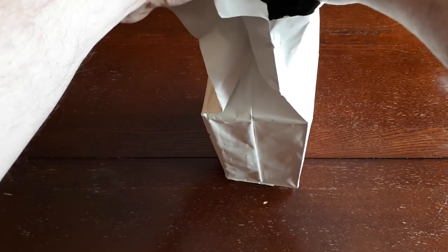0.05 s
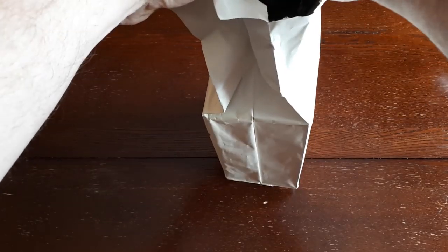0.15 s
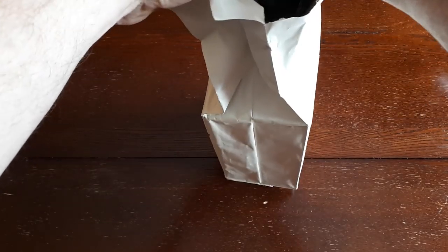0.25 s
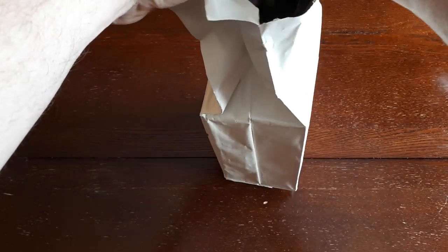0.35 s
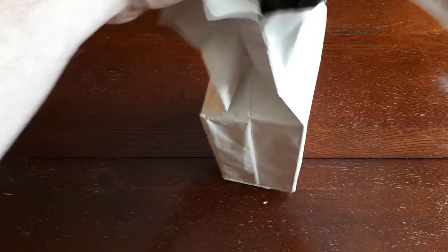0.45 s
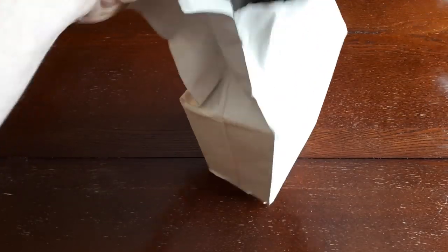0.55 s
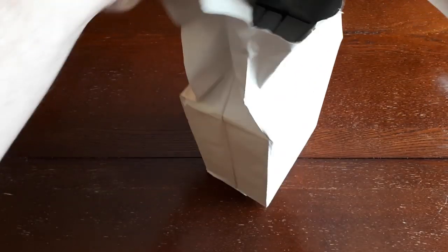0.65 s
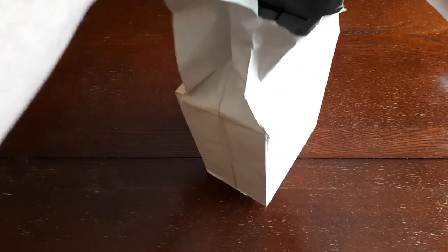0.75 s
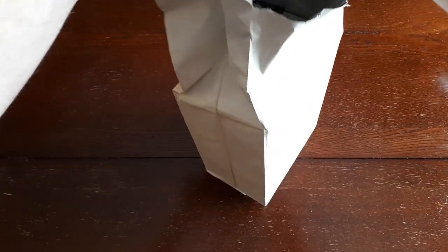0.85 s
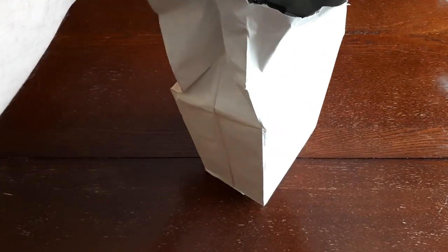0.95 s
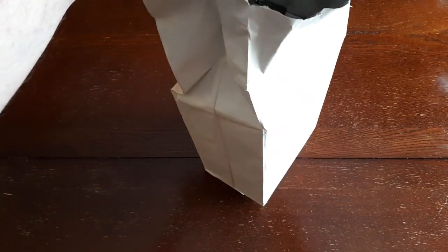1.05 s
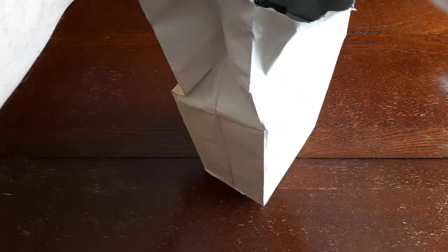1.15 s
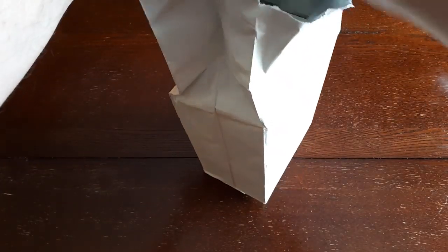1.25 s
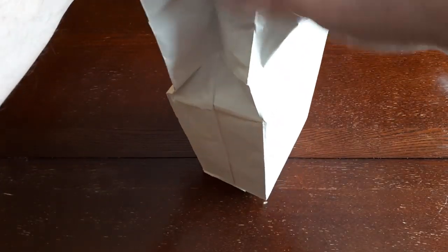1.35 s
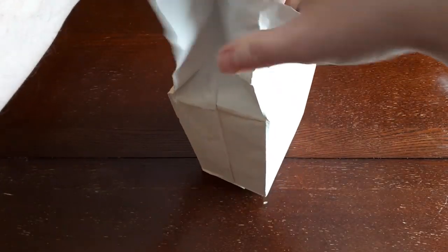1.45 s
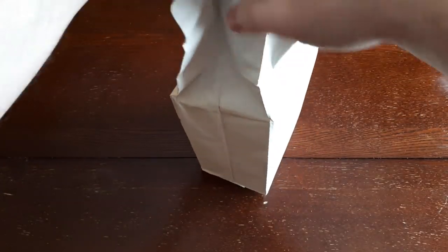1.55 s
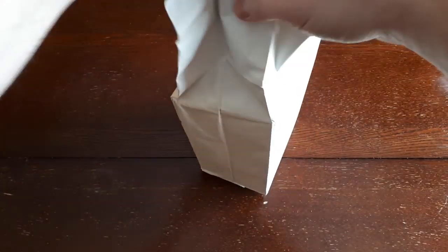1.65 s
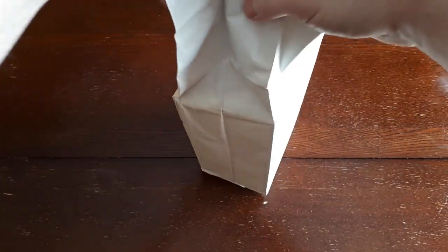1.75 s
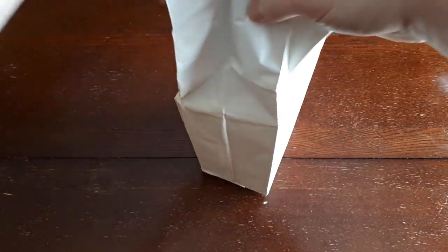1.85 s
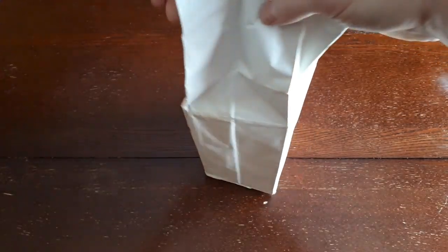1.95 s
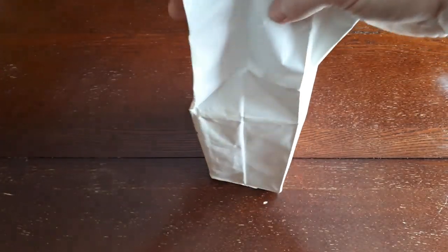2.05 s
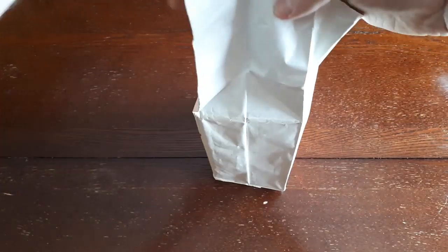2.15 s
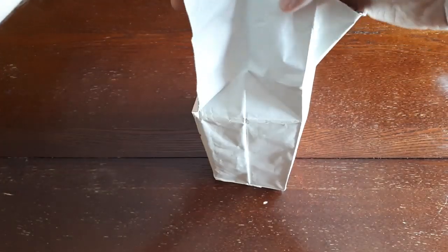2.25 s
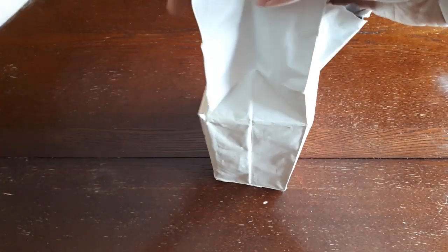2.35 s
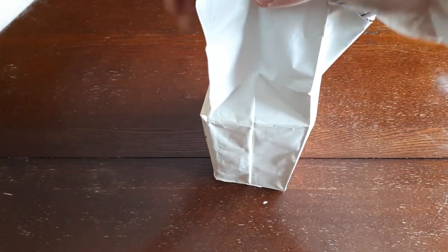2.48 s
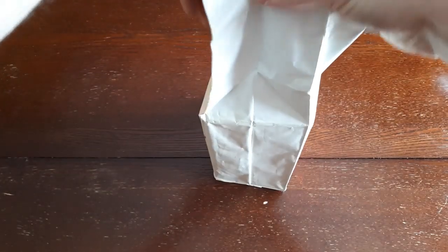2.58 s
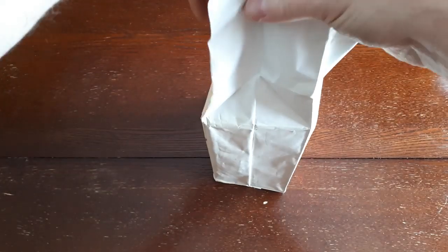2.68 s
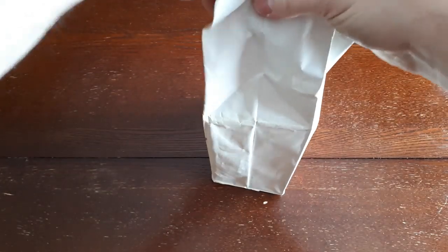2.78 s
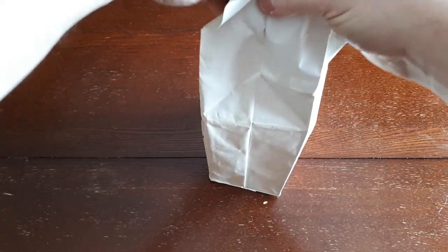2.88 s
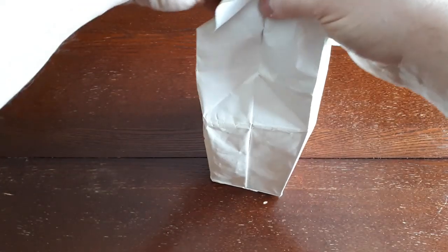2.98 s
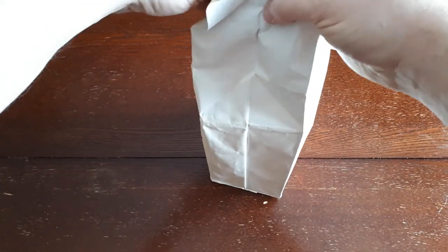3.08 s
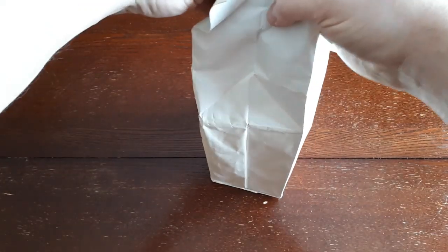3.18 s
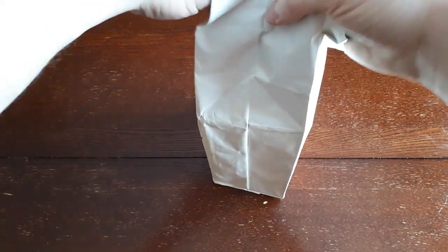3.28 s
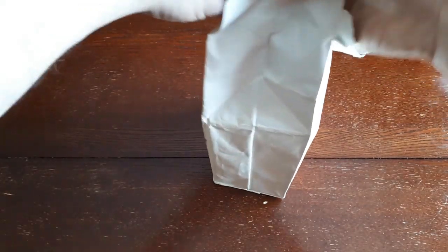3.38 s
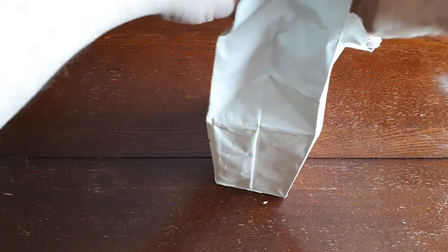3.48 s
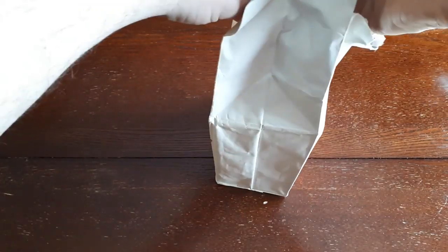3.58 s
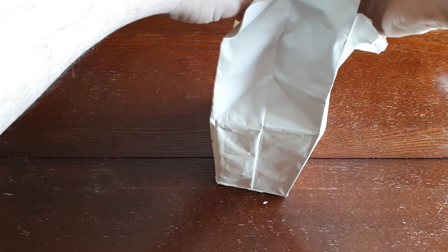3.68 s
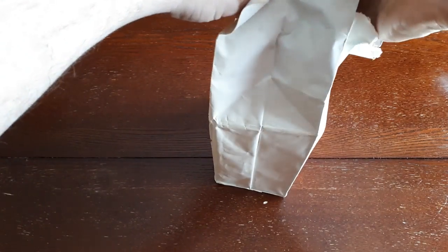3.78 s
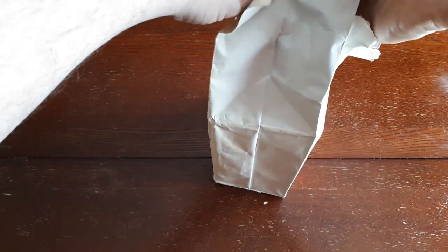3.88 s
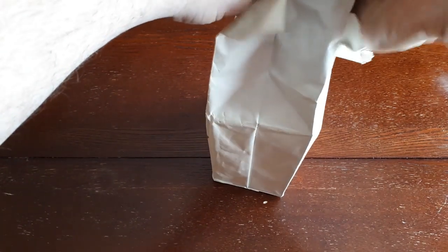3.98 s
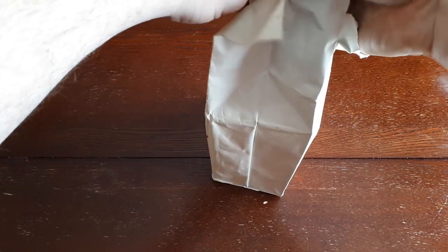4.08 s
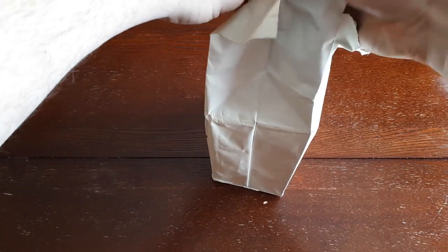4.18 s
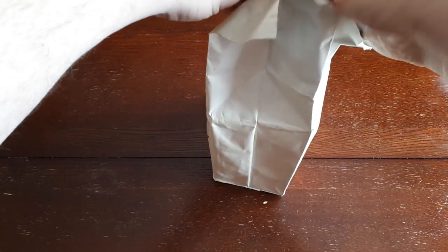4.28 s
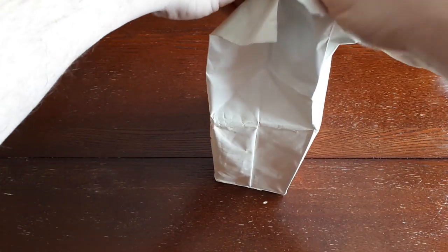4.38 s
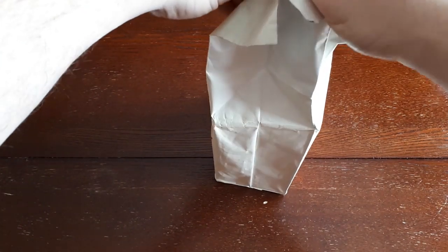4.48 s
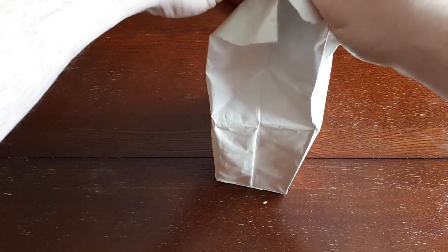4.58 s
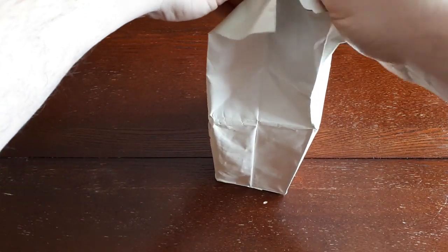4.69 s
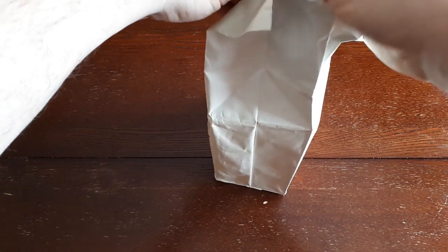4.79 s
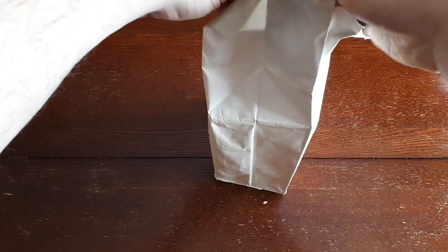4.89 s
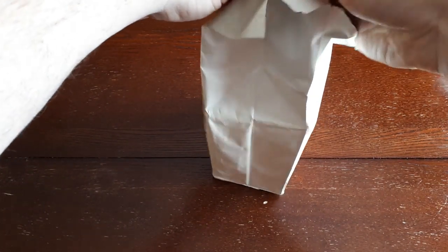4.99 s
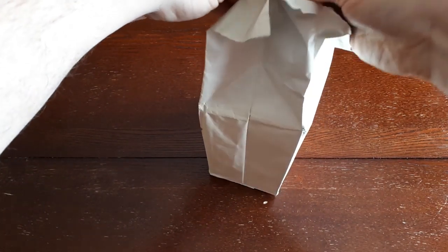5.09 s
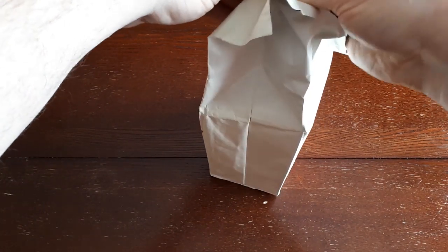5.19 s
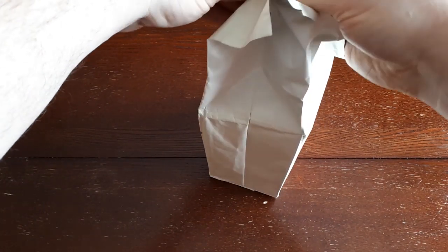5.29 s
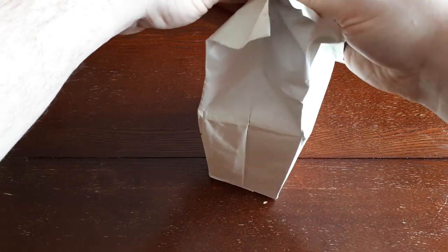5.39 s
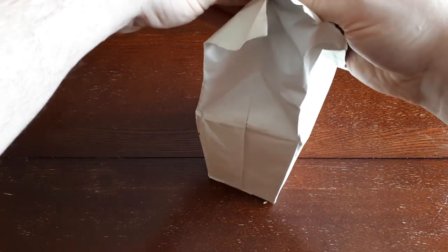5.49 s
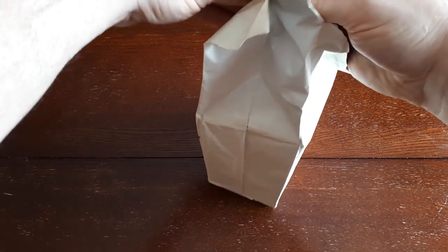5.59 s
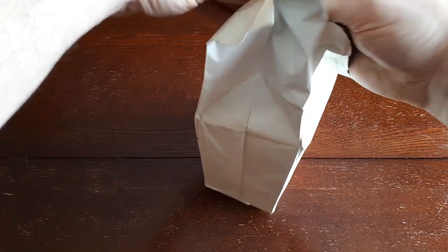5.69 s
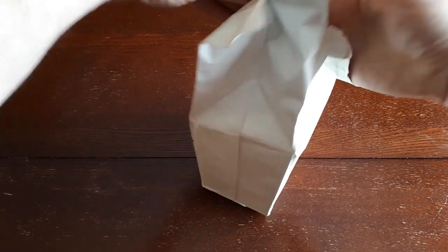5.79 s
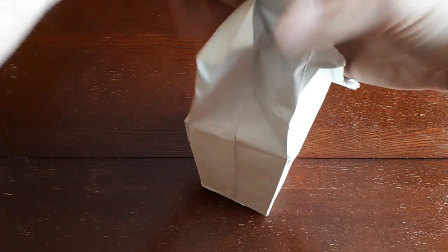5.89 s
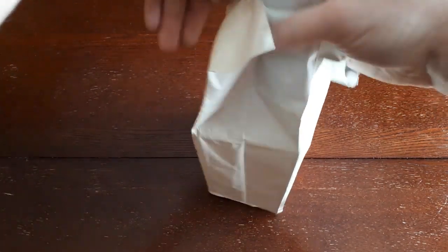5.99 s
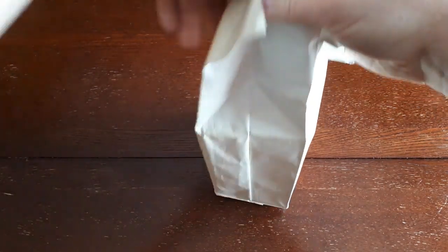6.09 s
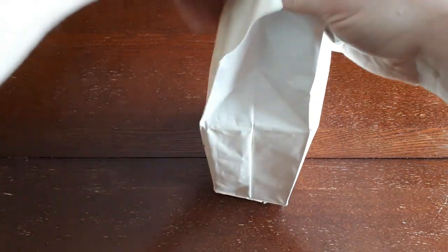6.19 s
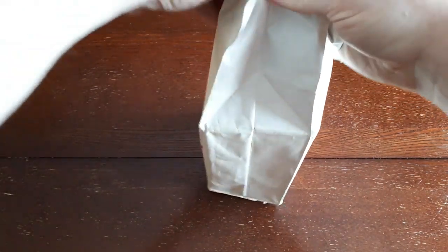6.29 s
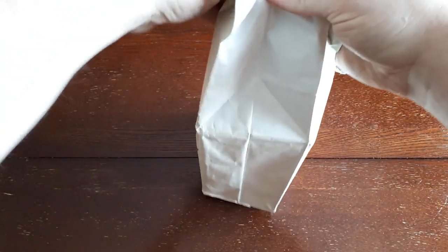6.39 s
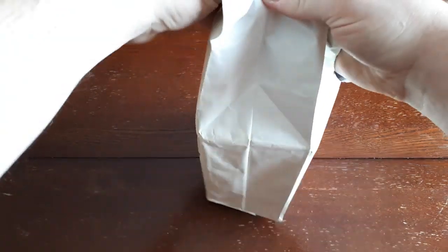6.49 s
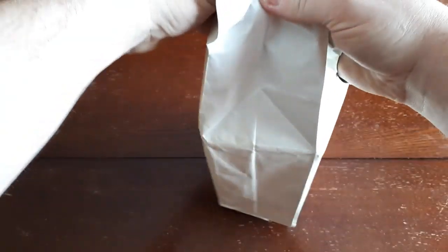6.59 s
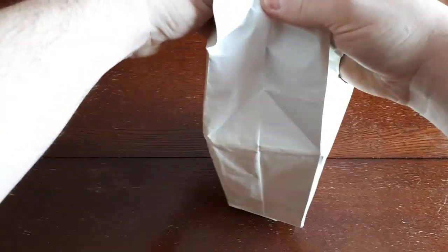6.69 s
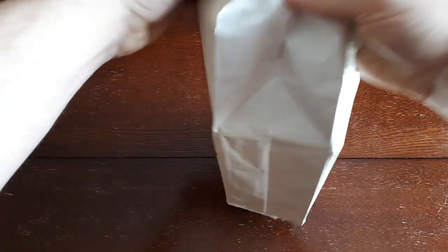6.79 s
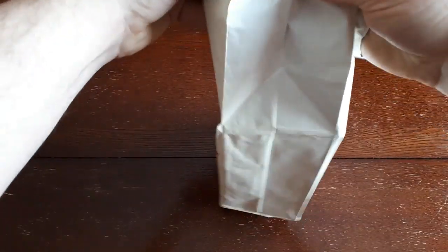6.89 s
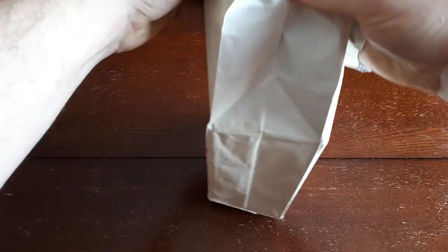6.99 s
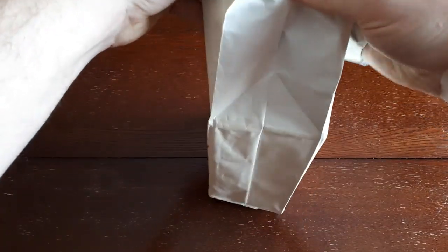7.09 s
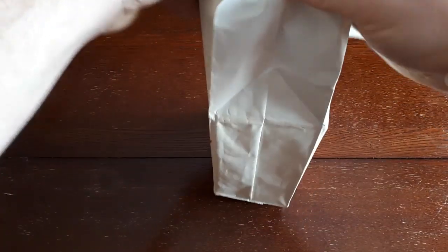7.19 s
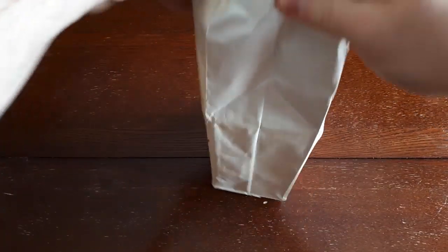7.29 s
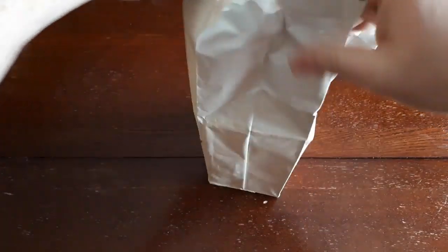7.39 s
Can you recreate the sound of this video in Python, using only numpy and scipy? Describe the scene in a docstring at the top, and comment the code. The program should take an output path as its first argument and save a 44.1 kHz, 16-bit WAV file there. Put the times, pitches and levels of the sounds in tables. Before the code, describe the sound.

A stiff paper bag with a foil lining is worked by hands on a wooden table, close by in stereo in a small dry room. Crackles start quietly, cluster around half a second, thicken between two and three and a half seconds, then thin to light rustling. Sharper snaps return after five seconds, with the loudest pops near 6.8, before a few last crinkles.

```python
"""Foil-lined paper bag handled.

A stiff bag is pulled open and handled on a wooden table in a small room, heard close by in stereo.
Creases snap: short jagged jolts ring a panel, crack paper and foil and thump the air in the bag.
Fingers and folds rub between them: band noise gated by tiny crinkles, coloured by panel and bag modes.
A thin rising whistle, a short diffuse room tail and steady room tone lie underneath."""
import sys
import numpy as np
from scipy import signal
from scipy.fft import rfft, irfft, next_fast_len
from scipy.io import wavfile
from scipy.ndimage import uniform_filter1d

SR = 44100
rng = np.random.default_rng(int(sys.argv[2]) if len(sys.argv) > 2 else 0)


def bounce(signal):
    """Save signal as a 16-bit WAV file at the path given by the first command-line argument."""
    frames = np.transpose(np.atleast_2d(signal))
    limited = np.clip(frames, -1, 1)
    pcm = np.round(limited * 32767).astype(np.int16)
    wavfile.write(sys.argv[1], SR, pcm)


N = 328530   # samples

# creases snapping; thump, paper, foil and settling levels are against the peak of the panel body:
# start_s, peak_db, pitch_hz, thump_db, paper_db, foil_db, settle_db, settle_t60_s, jump_s
CREASE_SNAPS = [(0.066, -44, 1140, -60, 6, -24, -1, 0.87, 0.0024),
                (0.126, -31.5, 1750, -23, -39, -41, -5.5, 0.43, 0.007),
                (0.294, -52, 660, -2, -8, -30, -32, 0.23, 0.0021),
                (0.36, -29, 740, -26, -2, -22, -6.5, 0.52, 0.002),
                (0.409, -28, 1930, -24, -11, -30, -16, 0.22, 0.0031),
                (0.466, -18.5, 1190, -13.5, 4, 2.5, -4.5, 0.27, 0.005),
                (0.482, -20, 700, -20, -6, -11, 0, 0.4, 0.003),
                (0.498, -31, 1200, -9, -4, -12, -16, 0.3, 0.0027),
                (0.512, -19, 693, -4, -8, -39, -5.5, 0.27, 0.0029),
                (0.541, -26, 1180, 0.5, -9, -25, -22, 0.23, 0.0041),
                (0.561, -23.5, 704, -3, -17, -33, -23, 0.21, 0.0032),
                (0.586, -30.5, 564, -4, -20, -30, -17, 0.3, 0.0041),
                (0.603, -25.5, 1750, -8.5, -8, -30, -9, 0.49, 0.0045),
                (0.657, -25.5, 736, -10.5, -20, -40, -8, 0.33, 0.0016),
                (0.677, -25.5, 730, -17, -27, -58, -8, 0.33, 0.0033),
                (0.823, -36.5, 1090, -30, -3, -13, -1.5, 0.22, 0.0055),
                (0.898, -41, 760, -25, -33, -24, -4, 0.56, 0.003),
                (0.96, -35.5, 740, -40, -11, -52, -2, 0.24, 0.0047),
                (1.023, -19.5, 1410, -15, -14, -23, -2, 0.17, 0.0048),
                (1.113, -35, 624, -17, -12, -8, -12.5, 1, 0.0026),
                (1.167, -38, 660, -14, -13, -18, -3.5, 0.42, 0.0043),
                (1.281, -49, 740, -9, -24, -50, -7.5, 0.3, 0.0046),
                (1.314, -46.5, 800, 0, -29, -47, -28.5, 0.3, 0.0023),
                (1.399, -54, 1120, -18, -20, -43, -2, 0.4, 0.0056),
                (1.453, -29.5, 1410, -20, -28, -35, -6, 0.34, 0.0014),
                (1.495, -23.5, 1140, -32, 0, -16, -5, 0.52, 0.0065),
                (1.506, -16, 1510, -19, -13, -25, -4, 0.31, 0.0035),
                (1.553, -23, 1850, -39, -13, -23, -7, 0.4, 0.0069),
                (1.585, -30, 958, -28, -13, -25, -17, 0.35, 0.0026),
                (1.621, -22.5, 800, -19, -28, -31, -18, 0.18, 0.0038),
                (1.648, -16.5, 1140, -19.5, 2.5, -18, -12, 0.4, 0.0079),
                (1.671, -21.5, 755, -43, 7, 1, -25.5, 0.98, 0.0079),
                (1.837, -23.5, 900, -75, -17, -66, -9.5, 0.59, 0.0067),
                (1.926, -35, 1860, -48, -26, -29, -5, 0.58, 0.004),
                (2.035, -32.5, 2340, -30, -30, -15, -18, 0.3, 0.0078),
                (2.073, -19, 785, -24.5, 2, -17, -3.5, 0.055, 0.0031),
                (2.128, -32.5, 720, -32, -23, -33, -25, 0.35, 0.0061),
                (2.213, -33, 800, -14, -16, -37, -13, 0.35, 0.003),
                (2.246, -30, 750, -11, 1, -35, -8, 0.22, 0.011),
                (2.307, -43, 820, -30, 16.5, -25, -14, 0.35, 0.0042),
                (2.337, -23, 1860, -35, -5, -22, -19, 0.22, 0.004),
                (2.362, -14.5, 1650, -22.5, -10, -49, -1, 0.11, 0.0032),
                (2.424, -16.5, 980, -28, 6, -23, -6, 0.085, 0.0043),
                (2.521, -36.5, 680, -12, -22, -19, 0, 0.47, 0.0039),
                (2.548, -27, 780, -13, 4, -7, -3.5, 0.37, 0.0042),
                (2.57, -27.5, 584, -11, 11.5, -28, 1, 0.22, 0.0067),
                (2.615, -28.5, 1520, -36, -1, -19, -1, 0.35, 0.0035),
                (2.645, -24.5, 1900, -37, 3, -25, -22, 0.3, 0.0039),
                (2.654, -36, 1060, -29, -11, 5, -2.5, 0.24, 0.0041),
                (2.683, -14.5, 1610, -22, 2.5, -19, -9, 0.2, 0.0035),
                (2.743, -26.5, 2020, -25, -7, -29, 0, 0.24, 0.0033),
                (2.748, -12, 805, -42, -7.5, -42, -12, 0.43, 0.0019),
                (2.762, -41, 864, -21, 0, -9, -4, 0.28, 0.0046),
                (2.774, -10.5, 1400, -29, 0.5, -25, -13.5, 0.19, 0.0023),
                (2.84, -27.5, 800, -14, 0, -22, -0.5, 0.35, 0.0022),
                (2.85, -25, 870, -24, 5.5, -24, -4.5, 0.36, 0.0069),
                (2.888, -27.5, 890, -16, 6.5, -32, -2.5, 0.3, 0.0075),
                (2.925, -30.5, 950, -16, -13, -41, -3, 0.57, 0.0049),
                (2.981, -29, 760, -19, 4.5, -26, 1, 0.23, 0.0092),
                (3.021, -21.5, 885, -24, -5, -42, -10, 0.28, 0.0019),
                (3.027, -16.5, 1000, -6.5, -5.5, -45, -12.5, 0.37, 0.0053),
                (3.1, -23, 846, -10, -20, -42, -2, 0.25, 0.0023),
                (3.127, -23, 900, -29, 1, -35, -2, 0.12, 0.003),
                (3.142, -12, 1340, -30, 1, -5, -24, 0.17, 0.0028),
                (3.224, -12.5, 2730, -87, -4, -20, -8, 0.11, 0.0032),
                (3.327, -20.5, 830, -16, -22, -27, -9, 0.37, 0.0022),
                (3.379, -23.5, 736, -11, 8.5, -12, -12, 0.49, 0.0063),
                (3.458, -24, 780, -16, -2, -33, -13, 0.36, 0.002),
                (3.48, -38, 766, -20, -14, -21, -18, 0.31, 0.0035),
                (3.501, -29.5, 750, -0.5, -23, -22, -24, 0.39, 0.0013),
                (3.667, -52.5, 1120, -40, 11, -2, 3, 0.84, 0.0027),
                (3.731, -41, 784, -31, -13, -9, -14, 0.35, 0.0035),
                (3.968, -28.5, 620, -21.5, -9, -20, -3, 0.84, 0.006),
                (4.013, -30.5, 630, -19, -17, -9, -8, 0.54, 0.0031),
                (4.033, -29.5, 2000, -27, -6, 1.5, -5, 0.23, 0.0033),
                (4.045, -24.5, 1840, -18, -11, -14, -24, 0.3, 0.0015),
                (4.11, -29, 1730, -19, 0, -14, -7, 0.16, 0.0059),
                (4.121, -33, 1870, -15.5, 0.5, -23.5, -21, 0.27, 0.0036),
                (4.252, -43.5, 1740, -29, -10, -5, -7.5, 0.78, 0.0028),
                (4.316, -38, 780, 7, -27, -20, -5, 0.26, 0.0022),
                (4.397, -45.5, 734, 0, -21, -1, -19, 0.35, 0.0027),
                (4.463, -46.5, 680, 3, -19, -10, -15, 0.38, 0.0033),
                (4.519, -43, 660, -4, -28, -34, -14, 0.35, 0.0076),
                (4.53, -35.5, 587, -6, -41, -27, -9, 0.26, 0.0051),
                (4.564, -53, 686, -21, -7, 1, -22, 0.29, 0.0029),
                (4.755, -46, 1770, -37, -16, 3, -18, 0.35, 0.0031),
                (4.831, -33, 1640, -38, -11, -25, -7, 1, 0.0032),
                (4.887, -24, 4200, -36, -5, -8, -7, 0.13, 0.0053),
                (4.893, -36, 810, -11, 11, -0.5, 1.5, 0.18, 0.0062),
                (5.017, -31, 677, -35, -12, -9, -10, 0.4, 0.0018),
                (5.027, -16.5, 1870, -29, -8, -19, -21, 1, 0.0037),
                (5.154, -43.5, 714, -6, -8, -13, -0.5, 0.31, 0.0043),
                (5.177, -36, 1200, -18, -13, -39, -2, 0.59, 0.0041),
                (5.212, -29, 1590, -35, -20, -52, -12, 0.48, 0.0021),
                (5.338, -53, 4450, -17, -14, 16, -13, 0.3, 0.0039),
                (5.37, -26.5, 2200, -42, -3, -15, -31, 0.23, 0.0023),
                (5.384, -43.5, 2080, -15, 0, 9, -0.5, 0.55, 0.0062),
                (5.427, -22.5, 5630, -40, -28, -7, -26, 0.3, 0.0012),
                (5.435, -33.5, 1600, -16, -1, -3, -2.5, 0.41, 0.0032),
                (5.45, -16.5, 2060, -43, -8, -15, -18, 0.5, 0.0018),
                (5.518, -23, 1400, -41, -6, -54, 5, 0.088, 0.0022),
                (5.559, -31, 4600, -21, -16, -7, -25, 0.35, 0.002),
                (5.691, -48.5, 785, -13, -6, 0, -9, 0.3, 0.0033),
                (5.743, -38, 890, -57, 0.5, -29, 2, 0.88, 0.0032),
                (5.809, -35.5, 885, -39, -4, -27, 3.5, 0.14, 0.0059),
                (5.866, -47, 861, -42, 4, -11, 1, 0.39, 0.0035),
                (5.892, -44, 835, -41, 2, -15, -12.5, 0.35, 0.004),
                (5.919, -26, 2310, -43, -3, -17, -13, 0.42, 0.0066),
                (5.938, -28, 1190, -24, 4, -26, -0.5, 0.24, 0.0037),
                (5.986, -37.5, 825, -27, 14, -30, -22, 0.22, 0.0029),
                (6.048, -35, 766, -15, -12, -10, -15, 0.35, 0.0026),
                (6.077, -38, 750, -5, -28, -34, 6, 0.13, 0.0038),
                (6.133, -43.5, 830, -5, 3, -7, 1.5, 0.3, 0.0031),
                (6.156, -38, 1750, -25, 0, -34, -2, 0.55, 0.0043),
                (6.185, -15, 1650, -25, 1.5, -4, -14, 0.39, 0.0038),
                (6.2, -23.5, 810, -13, -20, -30, -18, 0.3, 0.0049),
                (6.222, -20, 1010, -16, -3, -25, -10, 0.65, 0.0037),
                (6.259, -21, 870, -16, -15, -28, -11, 0.35, 0.0029),
                (6.293, -22, 2000, -41, -12, -40, -24, 0.31, 0.0052),
                (6.316, -15, 1170, -15, 2.5, -12, -6.5, 0.17, 0.0067),
                (6.353, -40, 604, 8.5, -25, -30, -22, 0.3, 0.0027),
                (6.38, -31.5, 774, -21, -16, -32, -3, 0.36, 0.003),
                (6.398, -22, 810, -13, -16, -30, -23, 0.35, 0.0043),
                (6.427, -28.5, 890, -9, -4, -13, -17, 1, 0.006),
                (6.472, -15.5, 1500, -19.5, -17, -33, -16.5, 0.37, 0.0027),
                (6.477, -14, 1630, -30.5, -18, -32, -4, 0.14, 0.0061),
                (6.698, -26.5, 1130, -27, -30, -10, -5.5, 0.59, 0.0064),
                (6.732, -24, 1130, -27, -7, 0, -3, 0.45, 0.0028),
                (6.747, -9.5, 820, -22, -10, -9, -5.5, 0.51, 0.0062),
                (6.776, -6.5, 1590, -16, -13, -15, -6.5, 0.23, 0.0022),
                (6.789, -19, 960, -23, -10, -20, -12, 0.17, 0.0031),
                (6.809, -11, 786, -10.5, -18, -9, -22, 0.15, 0.0022),
                (6.903, -30, 780, -10.5, -19, -28, -5.5, 0.54, 0.0026),
                (7.017, -48, 780, -0.5, -11, -29, 3, 0.16, 0.004),
                (7.277, -34, 780, -25, -14, -27, -1.5, 0.45, 0.0066),
                (7.313, -21, 2320, -18, -13, -10, -5.5, 0.26, 0.0047),
                (7.365, -28.5, 710, -6.5, -12, -13, -8, 0.35, 0.0035),
                (7.373, -25.5, 760, -5.5, -7, -8, -11, 0.36, 0.0031)]
# air modes of the hollow bag: mode_hz, width_hz, level_db
BAG_MODES = [(186.4, 27, -1.5), (319.4, 30.7, 7.5), (411, 32, 0)]
JOLT_DELAY_S = 0.001503   # delay of each snap's jolt after its settling rustle begins
REFOLD_SHIFT, REFOLD_DB = 0.043, 2.5   # spread of mode pitch (share) and strength from snap to snap


def snaps():
    """A crease jumps in a few ms of jagged motion that drives panel, paper, foil and air; mid and side."""
    size = 2400
    out, t = np.zeros((2, N + size)), np.arange(size) / SR
    for start_s, peak_db, pitch_hz, thump_db, paper_db, foil_db, _, _, jump_s in CREASE_SNAPS:
        white = rng.standard_normal((2, size))
        jagged = white * np.exp(-(t / jump_s) ** 1.6) * np.minimum(t / 0.0002, 1)
        jerk = 1.58 * np.sign(white[:, :1]) * pulse(t, 0.0001, 0.0001) * [[1], [0.6]]
        hit = panel_body(jagged + jerk, pitch_hz)
        hit = hit + amp(paper_db) * paper_crack(white, jerk, jump_s, t)
        hit = hit + amp(foil_db) * foil_crack(white, jump_s, t)
        hit = hit + amp(thump_db) * bag_thump(white, t)
        at = round((start_s + JOLT_DELAY_S) * SR)
        out[:, at:at + size] += amp(peak_db) * hit
    return out[:, :N]


def panel_body(jolt, pitch_hz):
    """The nearest panel rings at its pitch, dark above it, over the broad body of the wall."""
    panel = resonate(resonate(jolt, pitch_hz, 0.2 * pitch_hz), pitch_hz, 0.9 * pitch_hz)
    # wall edges for a 1 kHz panel; they follow the panel pitch only in part
    wall_hz = np.array([635, 2060]) * (pitch_hz / 1000) ** 0.36
    return peak_one(peak_one(panel) + 0.9 * peak_one(band(jolt, *wall_hz, order=3)))


def paper_crack(white, jerk, jump_s, t):
    """Paper cracks on the first jerk and dies faster than the jump."""
    return peak_one(band(jerk + white * np.exp(-t / (0.26 * jump_s)), 1600, 4430, order=3))


def foil_crack(white, jump_s, t):
    """The foil lining cracks as a short bright burst, faster than the jump."""
    return peak_one(band(white * np.exp(-t / (0.38 * jump_s)), 4200, 20300, order=3))


def bag_thump(white, t):
    """A wall shoves the air in the bag smoothly and jaggedly; its modes answer slowly."""
    shove = 0.57 * pulse(t, 0.00052, 0.00043) * [[1], [0.4]]
    push = shove + white * np.exp(-t / 0.0069)
    uneven_db = REFOLD_DB * rng.standard_normal(len(BAG_MODES))
    modes = [amp(level_db + uneven) * resonate(push, mode_hz, width_hz)
             for (mode_hz, width_hz, level_db), uneven in zip(BAG_MODES, uneven_db)]
    return peak_one(sum(modes))


# colour of the rustle: freq_hz, band_gain_db
SHEET_COLOUR = [(65, -28.5), (120, 2), (200, 1.5), (500, -9.5), (900, -6.5), (2800, -1), (5200, 3),
                (7500, 3), (10000, 2.5), (13000, -0.5), (17000, 5.5)]
# panel modes at rest: mode_hz, width_hz, level_db
PANEL_MODES = [(777, 70, 5.5), (1169, 26, 6), (1650, 50, 3.5), (2056, 114, 3.5), (2750, 86, 2.5)]
STEP = 32   # samples per value of the rustle power


def rustle():
    """Noise gated by crinkles, band by band: shared ones cross all bands, local ones stay in a region."""
    out, edges_hz = 0, 56 * 2 ** np.arange(0, 8.7, 0.5)
    shared = crinkles(per_s=250, spread_db=7.0, decay_s=0.0029)
    local = [crinkles(per_s=170, spread_db=3.0, decay_s=0.005) for _ in range(6)]
    white = rng.standard_normal((2, 2, N))
    flicks = [white[k % 2] * moments(per_s=45) + 1e-18 for k in range(3)]
    for k, (low_hz, high_hz) in enumerate(zip(edges_hz, edges_hz[1:])):
        centre_hz = np.sqrt(low_hz * high_hz)
        gain = np.repeat(np.sqrt(rustle_power(centre_hz)), STEP)[:N]
        gain = gain * amp(at_hz(SHEET_COLOUR, centre_hz) - 9.5)
        gate = 0.52 + 0.2 * shared + 0.48 * local[k // 3]
        rub = rms_one(band(white[k % 2] * gate, low_hz, high_hz))
        # small facets of the sheet ring a few cycles when a crinkle flicks them
        facet_hz = low_hz * (high_hz / low_hz) ** rng.random()
        facets = rms_one(refolded(flicks[k % 3], facet_hz, 0.05 * facet_hz, 11))
        out = out + gain * (rub + 0.28 * facets)
    return out + sum(refolded(out, *mode) for mode in PANEL_MODES + BAG_MODES)


def crinkles(per_s, spread_db, decay_s):
    """Envelope of tiny creases at random moments, a few much larger than the rest."""
    heights = amp(spread_db * np.minimum(rng.exponential(1, 5003), 4))
    creases = np.resize(heights, N) * moments(per_s)
    r = np.exp(-1 / (decay_s * SR))
    return rms_one(signal.lfilter([1], [1, -r], creases + 1e-18))


def moments(per_s):
    """Ones at random samples, zeros elsewhere."""
    marks = np.zeros(N)
    marks[(rng.random(int(per_s * N / SR)) * N).astype(int)] = 1
    return marks


def refolded(x, mode_hz, width_hz, level_db):
    """What one mode adds to the rustle; each snap refolds the bag and gives it a new pitch and strength."""
    cuts = [0] + [int(row[0] * SR) for row in CREASE_SNAPS] + [N]
    out, state = np.zeros_like(x), np.zeros((len(x), 2))
    r = np.exp(-np.pi * width_hz / SR)
    for start, end in zip(cuts, cuts[1:]):
        shift, uneven = rng.standard_normal(2)
        turn = 2 * np.pi * mode_hz * (1 + REFOLD_SHIFT * shift) / SR
        gain = (amp(level_db + REFOLD_DB * uneven) - 1) * (1 - r * r) / 2
        out[:, start:end], state = signal.lfilter(
            [gain, 0, -gain], [1, -2 * r * np.cos(turn), r * r], x[:, start:end], zi=state)
    return out


# centres of hollow body, panels, paper, foil, top of the foil: freq_hz
REGION_HZ = [200, 800, 2600, 7500, 14000]
# how far each of these regions follows the foil: share
REGION_FOIL_SHARE = [0.17, 0.058, 0.22, 1.207, 1.21]


def rustle_power(centre_hz):
    """Powers of rubbing, slides and settling add up in the band; one value a STEP."""
    t = np.arange(0, N, STEP) / SR
    hollow, paper, foil = [at_hz(list(zip(REGION_HZ, share)), centre_hz)
                           for share in ([1, 0, 0, 0, 0], [0, 0, 1, 0, 0], REGION_FOIL_SHARE)]
    return (rubbing_power(t, hollow, paper, foil) + slide_power(t, hollow, foil)
            + settling_power(t, hollow, paper, foil))


# hands working the bag; hollow body, paper and foil are against the rubbing level:
# time_s, level_db, hollow_db, paper_db, foil_db
HAND_RUBBING = [(0.0, -50, -23, -2.5, -4.5), (0.18, -70.5, -6, -7, 3), (0.41, -65, -13, 13, -9),
                (0.54, -26, -15, 6, -18.5), (0.77, -62, -14, -9, -8), (1.1, -45, -13, -2, -14),
                (1.28, -72, 8, -24, -20), (1.49, -49, -16, 3, -24), (1.64, -42.5, -32, 4, -13),
                (1.89, -59, -6, 8.5, -15), (2.07, -46.5, -26, -3, -18), (2.22, -34, -12, -2, -17),
                (2.78, -48, -12, 2, -11.5), (3.32, -48.5, -30, 8.5, -9.5), (3.5, -62.5, -3, -2, -16),
                (3.8, -41.5, -22, 1, -11.5), (3.92, -50.5, -11, 0.5, -12.5), (4.36, -56.5, -11, 2.5, 0),
                (4.44, -58, -2, -9.5, -6), (4.55, -57, -3, -18, -9), (4.62, -63.5, -15, 17, 16),
                (4.79, -73, -5, -9, -7), (5.0, -58, -1, -7, -6), (5.56, -69, 0, 13, 7),
                (6.22, -55.5, -2, 6.5, -0.5), (6.37, -40.5, -10, 2.5, -10.5), (6.53, -56, -33, -2, -20),
                (6.89, -53, -14, -1, -12), (7.03, -67, 8, -5, -18), (7.14, -61.5, -6, -14, -14),
                (7.26, -46.5, -21, 2.5, -12.5), (7.45, -54.5, -11, 1, 4)]


def rubbing_power(t, hollow, paper, foil):
    """Hands rub the sheet without pause; level and balance glide from row to row."""
    time_s, level_db, hollow_db, paper_db, foil_db = np.transpose(HAND_RUBBING)
    band_db = level_db + hollow * hollow_db + paper * paper_db + foil * foil_db
    return amp(2 * np.interp(t, time_s, band_db))


# fingers sliding over the lining: start_s, length_s, foil_db, panels_db (against the foil)
FINGER_SLIDES = [(0.15, 0.063, -62, 4), (0.345, 0.2, -49.5, -1), (0.478, 0.082, -32.5, -2),
                 (0.712, 0.21, -64, 1), (0.78, 0.054, -57, -5), (1.163, 0.097, -58, -3),
                 (1.454, 0.091, -51, 8), (1.614, 0.03, -65, -2), (2.012, 0.08, -48.5, 4.5),
                 (2.161, 0.16, -57, 27.5), (2.318, 0.072, -43.5, 9), (2.51, 0.031, -59, -3),
                 (3.105, 0.063, -52.5, 21), (3.264, 0.21, -45, 9), (3.498, 0.098, -54.5, 14.5),
                 (3.686, 0.12, -50.5, 5), (3.962, 0.17, -46.5, 8.5), (4.208, 0.14, -54, -10),
                 (4.366, 0.038, -51, -6), (4.402, 0.095, -54.5, -26), (4.517, 0.07, -56, -23),
                 (4.555, 0.12, -50, -8), (4.716, 0.17, -53.5, 6), (4.87, 0.17, -51, 8.5),
                 (5.018, 0.12, -49, 11), (5.127, 0.023, -48.5, -2), (5.21, 0.27, -63, -15),
                 (5.338, 0.12, -43, -15), (5.402, 0.074, -40, -4), (5.496, 0.16, -49, 2.5),
                 (5.683, 0.11, -53, 6.5), (5.859, 0.13, -47.5, 6.5), (5.993, 0.1, -49, -1),
                 (6.153, 0.098, -45, 12), (6.44, 0.18, -54, 7), (6.58, 0.089, -53, -26),
                 (6.636, 0.1, -51, -32), (6.715, 0.051, -38.5, 3), (6.766, 0.078, -35.5, 16.5),
                 (6.904, 0.13, -59, 9.5), (7.167, 0.097, -63, 1), (7.33, 0.092, -53.5, 21)]


def slide_power(t, hollow, foil):
    """Each slide swells over a third of its length and fades from 0.59 to 1.41 lengths."""
    power = 0
    for start_s, length_s, foil_db, panels_db in FINGER_SLIDES:
        done = (t - start_s) / length_s
        shape = np.clip(np.minimum(done / 0.33, (1 - done) / 0.82 + 0.5), 0, 1)
        # the hollow body lies 19.5 dB under the panels
        gain = amp(foil_db + max(1 - foil, 0) * panels_db + hollow * -19.5)
        power = power + (shape ** 2 * gain) ** 2
    return power


def settling_power(t, hollow, paper, foil):
    """The sheet settles with each snap, coloured by its thump and cracks; the foil dies faster."""
    power = np.zeros(len(t))
    for start_s, peak_db, _, thump_db, paper_db, foil_db, settle_db, t60_s, _ in CREASE_SNAPS:
        at = int(start_s * SR / STEP)
        after_s = t[at:at + 600] - t[at]
        start_db = (peak_db + settle_db + hollow * 0.81 * thump_db
                    + paper * 0.37 * paper_db + foil * (0.5 * foil_db - 5))
        fade_db = 60 * after_s / t60_s * (1 + 0.61 * foil)
        rise = np.minimum(after_s / 0.00035, 1)
        power[at:at + 600] += amp(2 * (start_db - fade_db)) * rise ** 2
    return power


# thin rising whistle: time_s, pitch_hz, level_db
WHISTLE = [(1.335, 10480, -80), (1.37, 10480, -74), (1.41, 10650, -74), (1.45, 11300, -70),
           (1.49, 11600, -69)]


def squeak():
    """A faint sine glides along the pitch table, with 13 ms fades."""
    time_s, pitch_hz, level_db = np.transpose(WHISTLE)
    t = np.arange(N) / SR
    fade = np.clip(np.minimum(t - time_s[0], time_s[-1] - t) / 0.013, 0, 1)
    phase = 2 * np.pi * np.cumsum(np.interp(t, time_s, pitch_hz)) / SR
    return fade * amp(np.interp(t, time_s, level_db)) * np.sin(phase)


# reverberation time of the small room: freq_hz, t60_s
ROOM_DECAY = [(100, 0.029), (400, 0.28), (1000, 0.15), (2800, 0.13), (7300, 0.043), (15000, 0.27)]


def room(x):
    """Diffuse tail: noise dying band by band, its own in mid and side."""
    t, edges_hz, tail = np.arange(SR // 3) / SR, 60 * 2 ** np.arange(0, 8.1, 1), 0
    for low_hz, high_hz in zip(edges_hz, edges_hz[1:]):
        decay = amp(-60 * t / at_hz(ROOM_DECAY, np.sqrt(low_hz * high_hz)))
        tail = tail + band(rng.standard_normal((2, len(t))), low_hz, high_hz) * decay
    tail = tail * np.clip(t / 0.000063 - 0.5, 0, 1)   # silent for the first 0.03 ms
    tail = tail / np.sqrt(np.sum(tail[0] ** 2))
    return signal.oaconvolve(x[None], tail, axes=1)[:, :N]


# colour of the room tone: freq_hz, relative_db (per Hz)
TONE_COLOUR = [(15, -47.5), (25, -5.5), (270, -7), (451, -61), (641, -7), (1260, -14), (1370, -33),
               (4000, -18), (10700, -24.5), (16000, -37)]


def room_tone():
    """Steady coloured noise at -69.5 dB rms, independent in mid and side."""
    return amp(-69.5) * rms_one(colour(rng.standard_normal((2, N)), TONE_COLOUR))


def amp(db):
    """Decibels to gain."""
    return 10 ** (np.asarray(db) / 20)


def rms_one(x):
    """Scale to unit rms."""
    return x / np.sqrt(np.mean(x ** 2) + 1e-20)


def peak_one(x):
    """Scale so that the first row peaks at 1."""
    return x / np.abs(x[0]).max()


def pulse(t, scale_s, decay_s):
    """One smooth push that rises at once and falls away."""
    return (t / scale_s) * np.exp(1 - t / decay_s)


def at_hz(points, hz):
    """Read a table on a log-frequency axis."""
    freq_hz, value = np.transpose(points)
    return np.interp(np.log(hz), np.log(np.maximum(freq_hz, 1)), value)


def colour(x, points):
    """Shape a spectrum by a table in dB."""
    size = next_fast_len(x.shape[-1])
    hz = np.maximum(np.arange(size // 2 + 1) * SR / size, 1)
    return irfft(rfft(x, size) * amp(at_hz(points, hz)), size)[..., :x.shape[-1]]


def resonate(x, hz, width_hz):
    """Two-pole resonance with gain 1 on top."""
    r = np.exp(-np.pi * width_hz / SR)
    turn = 2 * np.pi * hz / SR
    return signal.lfilter([(1 - r * r) / 2, 0, (r * r - 1) / 2], [1, -2 * r * np.cos(turn), r * r], x)


def band(x, low_hz, high_hz, order=2):
    """Butterworth band-pass."""
    return signal.sosfilt(signal.butter(order, [low_hz, high_hz], "band", fs=SR, output="sos"), x)


# stereo width: freq_hz, side_gain_db
SIDE_GAIN = [(60, -4), (125, -9.5), (250, -12), (500, -8.5), (1000, -6.5), (2000, -4), (4000, -2.5),
             (8000, 0.5), (15000, -1)]
LEFT_DB = -0.88   # the right gets the opposite
LEAD_S = 0.00004   # the bag is a little nearer the left microphone


def scene():
    """Bag, room and room tone as mid and side, then left and right."""
    hits, rub = snaps(), rustle()
    mid, side = hits + rub + room(amp(-10.0) * hits[0] + amp(-12.5) * rub[0])
    tone = room_tone()
    mid, side = mid + squeak() + tone[0], colour(side + tone[1], SIDE_GAIN)
    # a small lead in arrival shows in the side as the slope of the low mid
    side = side + LEAD_S / 2 * SR * np.gradient(uniform_filter1d(mid, size=9))
    return np.array([(mid + side) * amp(LEFT_DB), (mid - side) * amp(-LEFT_DB)])


def record(dry):
    """The loudest peaks are rounded, the top is cut steeply."""
    rounded = 0.85 * np.tanh(dry / 0.85)
    return signal.sosfilt(signal.cheby2(20, 60, 15900, fs=SR, output="sos"), rounded)


dry = scene()
out = record(dry)
bounce(out)
```